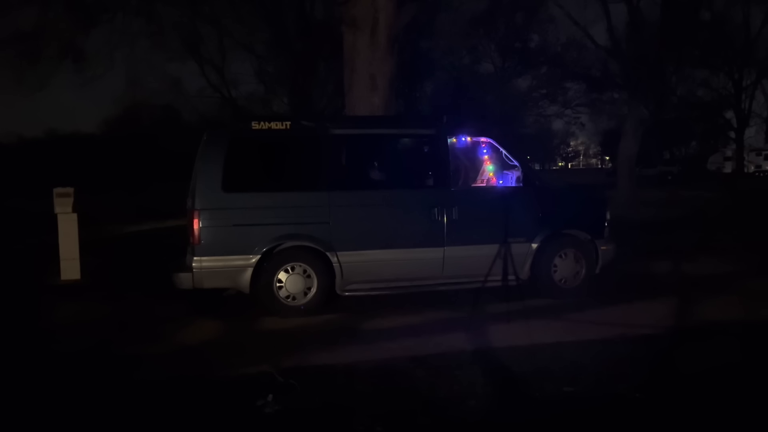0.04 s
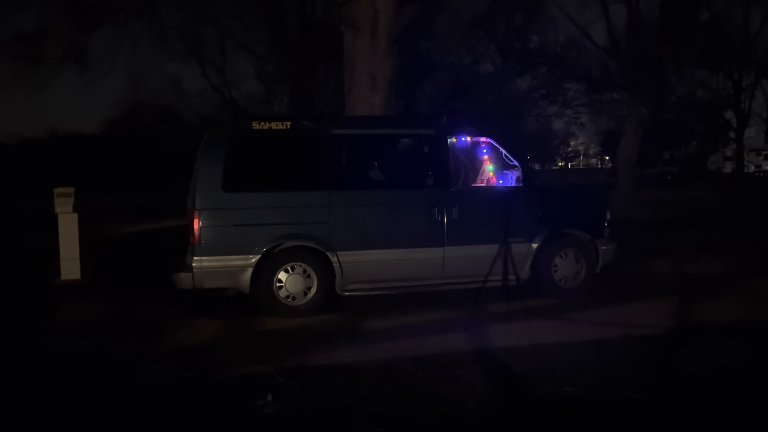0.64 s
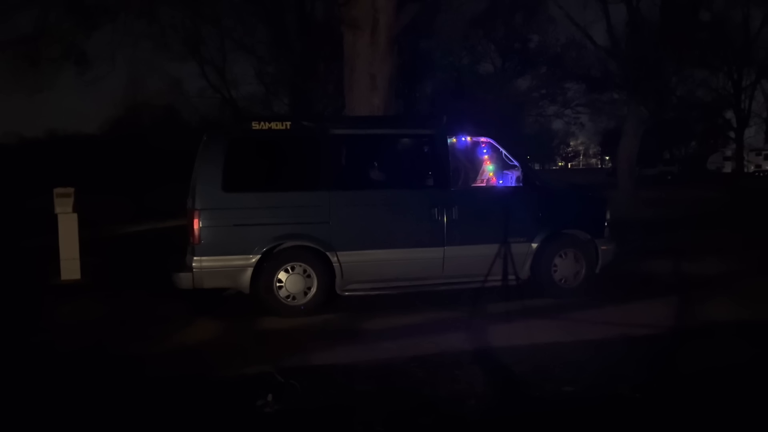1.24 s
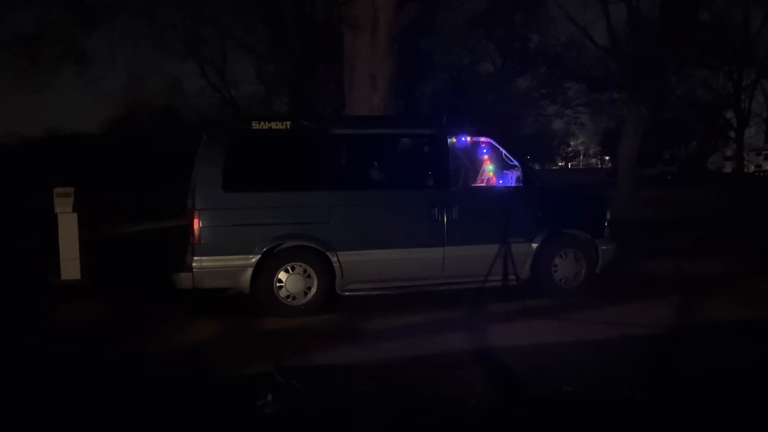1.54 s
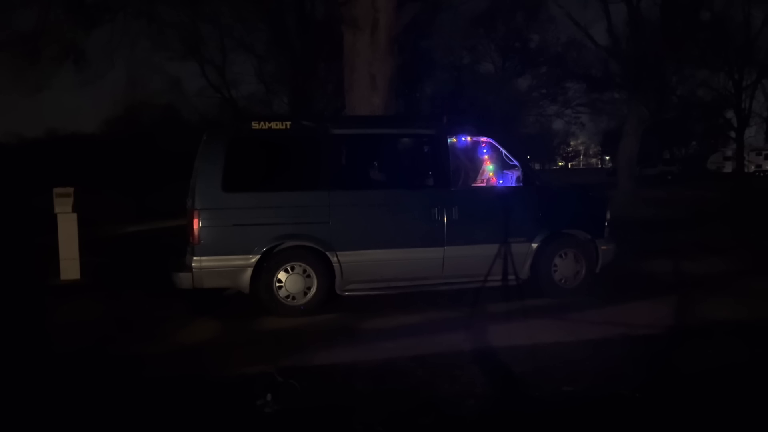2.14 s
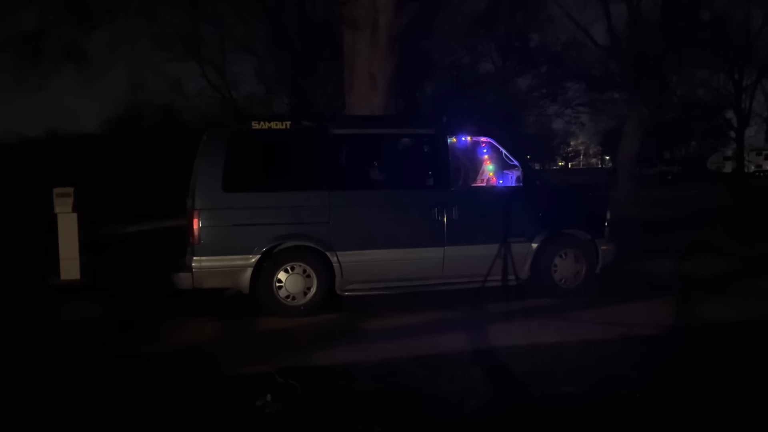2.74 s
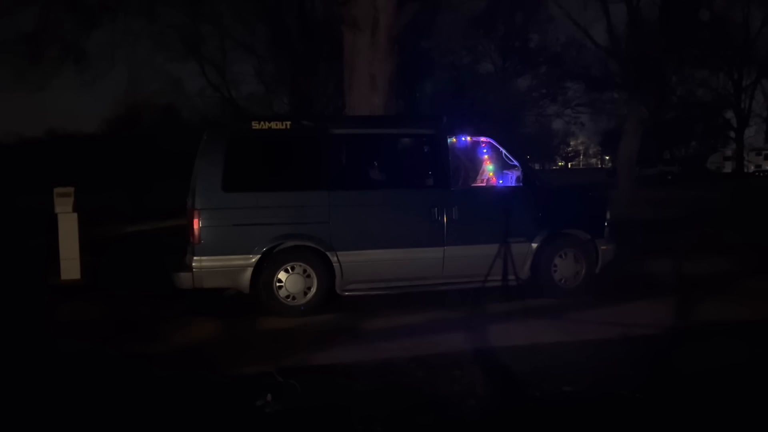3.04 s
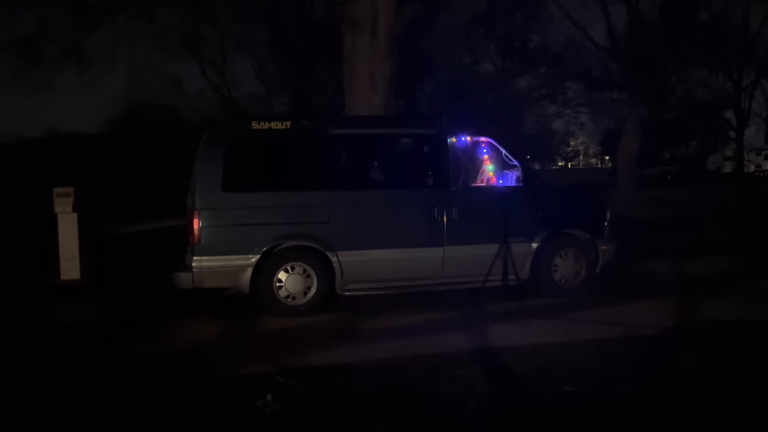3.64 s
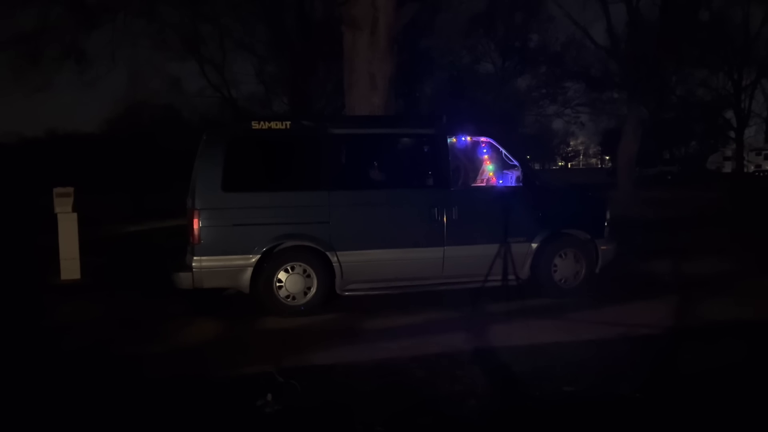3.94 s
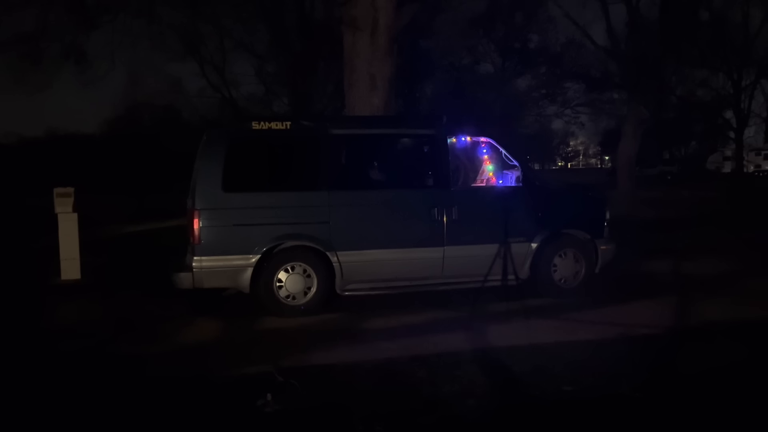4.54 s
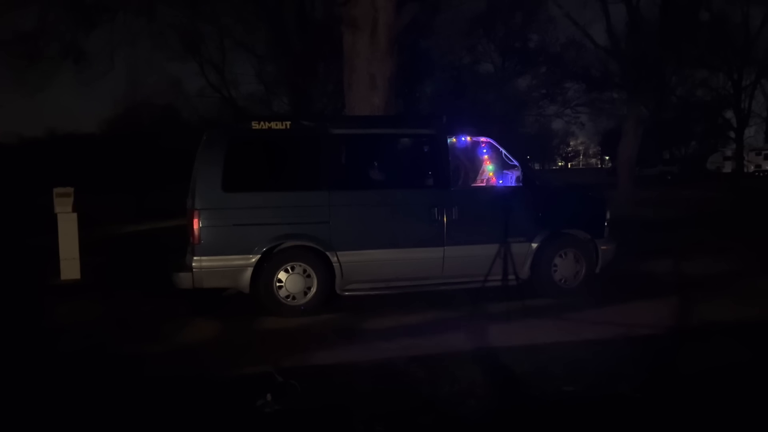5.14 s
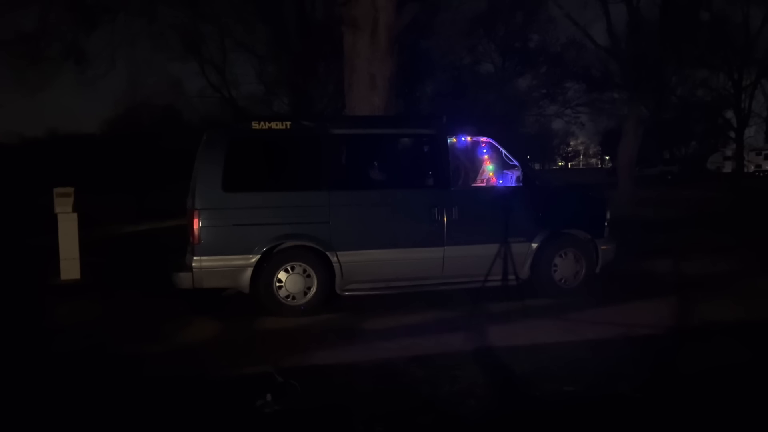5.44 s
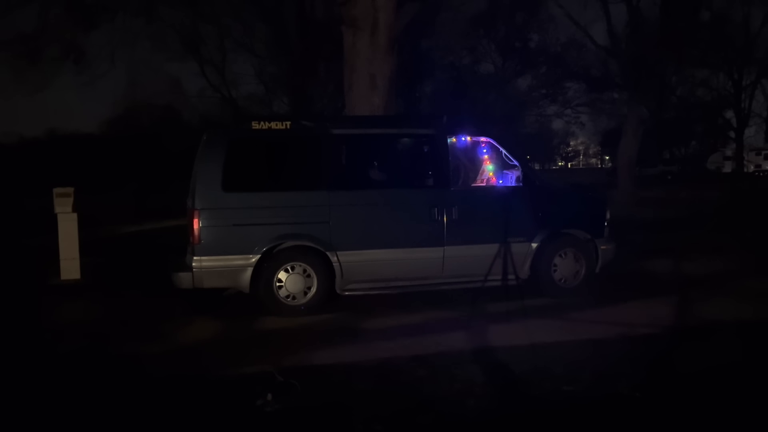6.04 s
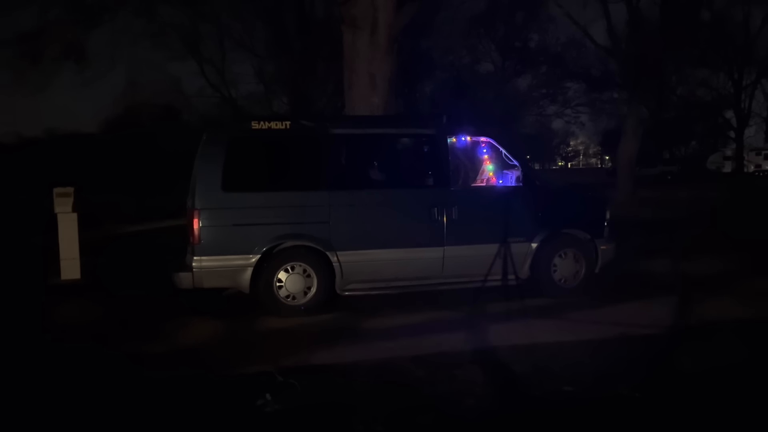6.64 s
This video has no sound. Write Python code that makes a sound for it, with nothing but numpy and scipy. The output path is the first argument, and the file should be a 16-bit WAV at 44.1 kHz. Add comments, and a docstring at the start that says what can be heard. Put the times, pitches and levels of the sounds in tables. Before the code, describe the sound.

A shrill chorus of small frogs runs unbroken for the whole seven seconds, outdoors at night by a wood. Their short, pure, rising peeps overlap into a flickering mass, with nearer whistles standing out, most often between 1.5 and 4.3 seconds. Lower-voiced frogs chuckle in quick runs of two to five clucking, sometimes raspy notes. The clearest run comes at about 0.7 seconds and another at 1.4. Softer ones follow around 2.8 and 3.5, a longer one around 4.5, and a stronger one near 5.4 seconds, with faint distant chuckles between. The trees give the calls a light echo. Wind rumbles on the microphone throughout in small, uneven gusts, low but prominent. Beneath it all lie a faint distant rumble and a soft even hiss, with one tiny, barely audible dry rustle close by at about 1 second.

```python
"""A shrill unbroken chorus, most likely of small frogs, at the edge of a wood at night.
Each peep is a short pure tone rising in pitch; many superpose, and a few nearer whistles stand out.
Brief tones stand for the bright flickers in the chorus where overlapping peeps beat together.
Lower-voiced frogs chuckle in short runs, their vocal folds modulating a throat tone; the trees echo them.
Wind eddies rumble on the microphone over a far rumble, a faint even hiss and one tiny rustle."""
import sys
import numpy as np
from scipy import signal
from scipy.fft import rfft, irfft
from scipy.io import wavfile
from scipy.ndimage import uniform_filter1d

SR = 44100
rng = np.random.default_rng(int(sys.argv[2]) if len(sys.argv) > 2 else 0)


def wrap_up_sound(samples):
    """Save the sound to the file named by the first command line argument, as 16-bit audio."""
    columns = np.atleast_2d(samples).T
    # keep every value between -1 and 1, then stretch to whole-number steps
    tamed = np.clip(columns, -1, 1)
    steps = np.round(tamed * 32767).astype(np.int16)
    wavfile.write(sys.argv[1], SR, steps)


N = 299880
PEEP_LEAD_S, NOTE_LEAD_S = .25, .1   # time from the start of a peep or chuckle note to its t = 0
NOTE_TIME = np.arange(-SR // 10, SR // 20) / SR
NOTE_SWELL_S = .017   # rise time constant of a note in a near run


def far_peepers(count=64, low_hz=2585, high_hz=3005, period_s=.85, scatter_hz=20, flutter_db=1.97):
    """Incoherent superposition: callers of independent pitch, distance and pace merge into a chorus."""
    # the chorus swells and thins: t/s, level/dB
    levels = [(0.0, -46.5), (.12, -46.5), (.22, -45.5), (.35, -51), (.42, -45), (.52, -46.5), (.605, -53),
              (.67, -46.5), (.8, -47), (1.03, -44.5), (1.19, -49), (1.27, -46.5), (1.43, -49), (1.66, -47),
              (1.77, -47.5), (1.96, -47), (2.15, -47), (2.25, -43.5), (2.48, -46.5), (2.68, -48.5),
              (2.77, -48.5), (2.85, -46), (3.15, -47), (3.35, -50), (3.55, -45.5), (3.72, -48),
              (3.9, -48.5), (4.17, -44), (4.32, -49.5), (4.68, -47), (4.8, -46), (5.08, -49), (5.3, -44),
              (5.52, -48.5), (6.04, -45), (6.2, -48), (6.4, -44.5), (6.66, -51.5), (6.8, -48.5)]
    spots = np.zeros((8, N))   # places along the water, each with its own echoes
    for k, pitch in enumerate(np.linspace(0, 1, count)):
        start, pace, distance, length = rng.random(4)
        hz = low_hz + pitch * (high_hz - low_hz)
        swell_s = .008 + .05 * length ** 2
        gain = from_db(-8 * distance - 12.5 * (2 * pitch - 1) ** 2)   # smallest and largest are fainter
        beats = np.arange(-1, 11) + start + rng.normal(0, .07, 12)
        times = beats * period_s * (.8 + .4 * pace)
        for s, detune in zip(times, rng.standard_normal(len(times))):
            if s < N / SR:
                call = peep(hz + scatter_hz * detune, swell_s, swell_s / 2, glide_hz_per_s=2315)
                add(spots[k % len(spots)], gain * call, s)
    chorus = sum(spot + from_db(-1) * wood(spot, build_s=.017) for spot in spots)
    flutter = flutter_db * drift(int(.015 * SR), N)
    return from_db(in_time(levels) + flutter) * steady(chorus, span_s=.07)


def whistles_and_flickers(whistle_swell_s=.048, flicker_swell_s=.0069, flicker_glide_hz_per_s=2800):
    """Direct sound carries the nearest whistles; brief tones stand for beats between overlapping peeps."""
    # long rising whistles, at their peaks: t/s, f/Hz, level/dB, glide/(Hz/s)
    whistles = [(.205, 2802, -43.5, 2000), (0.454, 2820, -44, 2000), (0.75, 2884, -43.5, 2440),
                (1.665, 2800, -41, 1800), (2.213, 2865, -41.5, 2030), (2.326, 2876, -40, 2570),
                (3.123, 2887, -39, 2010), (3.393, 2803, -45, 1960), (3.535, 2885, -41, 2000),
                (3.686, 2860, -40, 4620), (3.823, 2876, -42.5, 2000), (4.085, 2845, -47, 1800),
                (4.225, 2850, -41.5, 2000), (4.961, 2840, -49, 1810), (5.321, 2740, -40, 1500),
                (5.901, 2886, -42.5, 2000), (6.086, 2860, -48, 1990)]
    # brief bright flickers in the chorus, at their peaks: t/s, f/Hz, level/dB
    flickers = [(.163, 2790, -39.5), (0.217, 2765, -34), (.39, 2640, -37.5), (.566, 2730, -38),
                (0.629, 2720, -35.5), (1.146, 2770, -33), (1.32, 2720, -38.5), (1.55, 2800, -36),
                (1.592, 2780, -41.5), (1.665, 2850, -44), (1.698, 2640, -39.5), (1.824, 2790, -34.5),
                (2.004, 2740, -35), (2.056, 2790, -31.5), (2.136, 2790, -33), (2.364, 2540, -41.5),
                (2.395, 2600, -42), (2.431, 2750, -40), (2.695, 2835, -39.5), (2.735, 2815, -38),
                (2.819, 2775, -36.5), (2.96, 2780, -36.5), (3.082, 2750, -35), (3.194, 2670, -34),
                (3.243, 2760, -36), (3.271, 2780, -36), (3.341, 2810, -35.5), (3.501, 2780, -36.5),
                (3.655, 2810, -40), (3.807, 2760, -39), (3.958, 2810, -38.5), (4.041, 2740, -37),
                (4.109, 2800, -39), (4.187, 2750, -39), (4.374, 2725, -37), (4.455, 2720, -36.5),
                (4.495, 2580, -41.5), (4.542, 2760, -38.5), (4.564, 2805, -36), (4.602, 2730, -36.5),
                (4.733, 2710, -35), (4.841, 2795, -38.5), (5.257, 2780, -38), (5.356, 2750, -39),
                (5.383, 2810, -34), (5.742, 2760, -35.5), (6.031, 2820, -35), (6.387, 2780, -36.5),
                (6.448, 2830, -39.5), (6.55, 2710, -35)]
    tones = [(*row, whistle_swell_s) for row in whistles]
    tones += [(*row, flicker_glide_hz_per_s, flicker_swell_s) for row in flickers]
    direct = np.zeros(N)
    for s, hz, db, glide_hz_per_s, swell_s in tones:
        tone = peep(hz, swell_s, .65 * swell_s, glide_hz_per_s)
        add(direct, from_db(db) * tone, s - PEEP_LEAD_S)
    return direct + from_db(-10) * wood(direct, build_s=.016)


def peep(hz, rise_s, fall_s, glide_hz_per_s):
    """A linear chirp: a pure whistle climbs through hz at the peak of a lopsided Gaussian envelope."""
    t = np.arange(-SR // 4, SR // 10) / SR
    envelope = np.exp(-(t / np.where(t < 0, rise_s, fall_s)) ** 2)
    return envelope * np.sin(2 * np.pi * (hz * t + .5 * glide_hz_per_s * t ** 2))


def chucklers(far_runs=20, far_db=-60, far_gap_s=.118, clear_pulse_hz=407, raspy_pulse_hz=114.6):
    """Multipath propagation: near and far chuckles arrive directly, as echoes and as reverberation."""
    # reflections from the tree line: delay t/s, relative level/dB
    echoes = [(.041, -15), (.095, -17)]
    direct = np.zeros(N)
    for s, db, hz, rasp, swell_s in chuckle_notes():
        pulse_hz = clear_pulse_hz + rasp * (raspy_pulse_hz - clear_pulse_hz)
        add(direct, from_db(db) * chuckle(hz, pulse_hz, rasp, swell_s), s - NOTE_LEAD_S)
    for start, pitch, roughness in rng.random((far_runs, 3)):
        for note in range(3):
            call = chuckle(1300 + 550 * pitch, pulse_hz=280, rasp=.307 + .235 * roughness, swell_s=.033)
            add(direct, from_db(far_db) * call, start * N / SR + note * far_gap_s)
    direct = signal.sosfilt(signal.butter(12, 2000, fs=SR, output="sos"), direct)
    heard = direct + from_db(-11.5) * wood(direct, build_s=.06)
    for delay_s, db in echoes:
        add(heard, from_db(db) * direct, delay_s)
    return heard


def chuckle_notes(last_note_db=-.5):
    """Periodic calling: runs step in pitch and peak on the last note but one; further notes join them."""
    # runs, with t, level and f at the loudest note:
    # t/s, notes, spacing/s, level/dB, growth/(dB/note), f/Hz, climb/(Hz/note), rasp (0-1)
    runs = [(.422, 3, 0.1, -49.5, 2, 1360, 161, 0.62), (.749, 3, .11, -37.5, 5, 1622, 20, 0.12),
            (1.42, 3, 0.12, -43.5, 7, 1570, -15, 0.16), (1.941, 2, 0.11, -51, 3, 1960, 1, 0.3),
            (2.84, 2, .138, -47.5, 0, 1716, 59, 0.62), (3.505, 3, .12, -48.5, 2, 1487, 100.5, .35),
            (4.529, 5, 0.12, -46, 3.5, 1632, 89, 0.55), (5.406, 3, 0.13, -41.3, 1.5, 1645, 50, 0.48)]
    # further chuckle notes, some within or overlapping the runs, some apart:
    # t/s, level/dB, f/Hz, rasp (0-1), swell/s
    further_notes = [(.095, -47, 1620, 0.3, 0.049), (2.708, -50, 1540, 0.26, .016),
                     (2.737, -56, 1830, .2, .01), (2.83, -49, 2020, 0.22, 0.018),
                     (3.665, -53, 1560, 0.34, 0.046), (3.905, -52.5, 1720, .5, .016),
                     (4.175, -51.5, 1560, .55, .016), (4.293, -47.5, 1370, 0.22, .012),
                     (4.546, -49, 914, 0.33, 0.01284), (5.155, -49, 1520, .6, .022),
                     (5.55, -53, 1960, 0.3, .012), (6.13, -53, 1570, 0.2, 0.033),
                     (6.326, -50, 1850, 0.55, .027)]
    for s, notes, gap_s, db, growth_db, hz, climb_hz, rasp in runs:
        for k in range(2 - round(notes), 2):
            relative_db = last_note_db if k > 0 else k * growth_db
            yield s + k * gap_s, db + relative_db, hz + k * climb_hz, rasp, NOTE_SWELL_S
    yield from further_notes


def chuckle(hz, pulse_hz, rasp, swell_s, droop_s=.0058, upper_db=1, chest_db=2.5, ragged_db=4):
    """Modulation by vocal folds gives a throat tone sidebands: a cluck, or a quack if they slap unevenly."""
    t = NOTE_TIME
    climb = (1.9 + 2.497 * rasp) * t * NOTE_SWELL_S / swell_s
    droop = .085 * (1 - rasp) ** 3 * np.logaddexp(0, 2 * t / droop_s)   # clear notes sag as air runs out
    jitter = .04 * rasp * drift(100)
    bend = np.maximum(1 + climb - droop + jitter, .75)
    slip = .8 * rasp * drift(130)   # each slap restarts the tone a little out of step
    throat_phase = 2 * np.pi * hz * np.cumsum(bend) / SR + slip
    stumble = .16 * rasp * drift(170)
    fold_phase = 2 * np.pi * (pulse_hz * np.cumsum(bend + stumble) / SR + rng.random())
    orders = np.arange(-4, 3)[:, None]   # sidebands; 0 is the throat tone
    ragged = np.array([drift(250) for _ in orders])
    colour_db = upper_db * (orders > 0) + chest_db * rasp * np.maximum(-orders - 1, 0)
    weights = np.clip(rasp, .01, .95) ** np.abs(orders) * from_db(colour_db + ragged_db * rasp * ragged)
    partials = weights * np.sin(throat_phase + orders * fold_phase)
    voice = np.sum(partials, axis=0) / np.linalg.norm(weights, axis=0)
    opening_s = 2.4 * swell_s * np.exp(-.6 * rasp)   # hoarse notes start more abruptly
    stop_s = .0041 + .02 * rasp
    return voice * np.exp(np.where(t < 0, t / swell_s - (t / opening_s) ** 4, -(t / stop_s) ** 2))


def wood(sound, build_s, t60_s=1):
    """Multiple scattering: countless trunks spread a sound into an exponentially decaying tail."""
    t = np.arange(SR) / SR
    build_up = 1 - np.exp(-(t / build_s) ** 2)
    tail = rng.standard_normal(SR) * from_db(-60 * t / t60_s) * build_up
    tail /= np.sqrt(np.sum(tail ** 2))
    return irfft(rfft(sound) * rfft(tail, N), N)


def wind():
    """Turbulence: eddies buffet the microphone port with low-frequency pressure fluctuations."""
    # gusts: t/s, level/dB
    gusts = [(0.0, -32.5), (0.12, -37), (.34, -34), (.59, -38.5), (.65, -33), (0.75, -43), (0.89, -33.5),
             (1.0, -36.5), (1.2, -40), (1.26, -35), (1.4, -36.5), (1.95, -36), (2.1, -36), (2.17, -39),
             (2.41, -32.5), (2.47, -35.5), (2.56, -32.5), (2.73, -36.5), (3.04, -37), (3.14, -33.5),
             (3.4, -37), (3.75, -35), (4.08, -40), (4.16, -34), (4.25, -45.5), (4.39, -37.5), (4.45, -33),
             (4.7, -34.5), (5.3, -34.5), (5.68, -36.5), (5.81, -33), (5.92, -36), (6.8, -39)]
    # buffeting spectrum: f/Hz, relative level/dB
    spectrum = [(20, -65), (31, -40), (42, -22.5), (53, -14), (64, -1.5), (90, -0.5), (104, -6), (140, -9),
                (200, -18), (300, -33), (600, -67), (2000, -100)]
    return from_db(in_time(gusts)) * steady(noise(spectrum), span_s=.15)


def far_rumble(gain_db=2.5):
    """Amplitude-modulated low noise: a far rumble wavers under the wind."""
    # slow swells: t/s, level/dB before the gain
    levels = [(0, -50), (.55, -48.5), (.8, -48.5), (1.5, -47.5), (1.7, -50.5), (1.95, -47.5), (2.2, -50),
              (2.54, -50.5), (2.7, -51.5), (2.95, -47), (3.05, -51), (3.18, -44.5), (3.46, -51.5),
              (3.63, -50.5), (3.85, -51.5), (4.25, -50), (4.55, -52), (4.88, -50), (5.05, -51), (5.4, -50),
              (6.25, -51.5), (6.8, -50.5)]
    # rumble spectrum: f/Hz, relative level/dB
    spectrum = [(60, -47), (130, 3), (220, -1.5), (300, -7), (400, -12.5), (600, -21.5), (1200, -43),
                (3000, -92)]
    return from_db(in_time(levels) + gain_db) * steady(noise(spectrum), span_s=.054)


def rustle(at_s=.959, peak_db=-64.5, attack_s=.006, decay_s=.026):
    """A noise transient with exponential rise and decay: one tiny dry rustle close by."""
    # rustle spectrum: f/Hz, relative level/dB
    spectrum = [(1500, -30), (5000, -2), (11000, -1), (13800, 4), (15500, -16)]
    t = np.arange(N) / SR - at_s
    envelope = np.exp(-np.abs(t) / np.where(t < 0, attack_s, decay_s))
    return from_db(peak_db) * envelope * noise(spectrum)


def hiss(level_db=-53.5):
    """Stationary broadband noise: the faint even background of the night."""
    # hiss spectrum: f/Hz, relative level/dB
    spectrum = [(40, -4), (200, 0.5), (600, 0.5), (1100, -1), (1400, -0.5), (1900, -3), (2080, -6),
                (4000, -6), (7000, -10.5), (10300, -14), (13000, -23), (15600, -30.5)]
    return from_db(level_db) * noise(spectrum)


def noise(spectrum):
    """Spectral shaping: white noise takes on the given colour, at unit power."""
    hz, db = np.transpose(spectrum)
    bin_hz = np.maximum(np.arange(N // 2 + 1) * SR / N, 1)
    gain = from_db(np.interp(np.log(bin_hz), np.log(hz), db))
    return rms_one(irfft(rfft(rng.standard_normal(N)) * gain, N))


def drift(span_samples, length=len(NOTE_TIME)):
    """Low-pass noise: a smooth random fluctuation of unit power."""
    return rms_one(smooth(rng.standard_normal(length), span_samples))


def steady(x, span_s):
    """Division by the running RMS holds the power near one."""
    return x / np.sqrt(smooth(x ** 2, int(span_s * SR)) + 1e-12)


def smooth(x, span_samples):
    """Two moving averages form a triangular low-pass window."""
    return uniform_filter1d(uniform_filter1d(x, span_samples), span_samples)


def rms_one(x):
    """Normalisation to unit power."""
    return x / np.sqrt(np.mean(x ** 2) + 1e-20)


def from_db(db):
    """Level to amplitude ratio."""
    return 10 ** (np.asarray(db) / 20)


def in_time(rows):
    """Linear interpolation of a curve at every sample."""
    return np.interp(np.arange(N) / SR, *np.transpose(rows))


def add(out, sound, start_s):
    """Superposition of a sound from a given time."""
    offset = int(round(start_s * SR))
    first, end = max(offset, 0), min(offset + len(sound), N)
    if end > first:
        out[first:end] += sound[first - offset:end - offset]


def scene():
    """Linear superposition of frogs, wind and background in one channel."""
    background = hiss() + far_rumble()
    frogs = whistles_and_flickers() + far_peepers() + chucklers()
    return (frogs + wind() + rustle() + background)[None]


def record(dry):
    """Band limiting: a steep elliptic low-pass cuts the treble above 15.7 kHz."""
    return signal.sosfilt(signal.ellip(10, .2, 80, 15700, fs=SR, output="sos"), dry)


dry = scene()
out = record(dry)
wrap_up_sound(out)
```